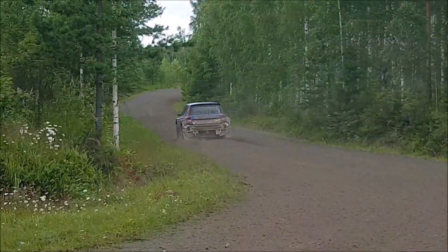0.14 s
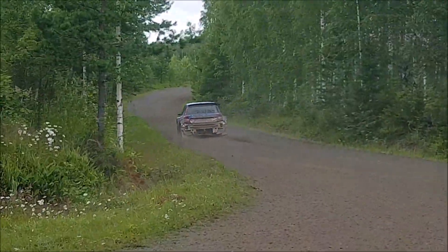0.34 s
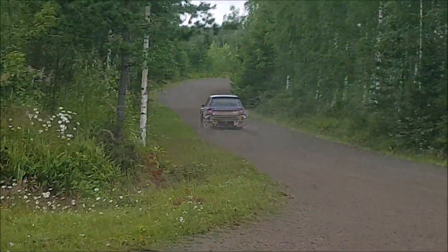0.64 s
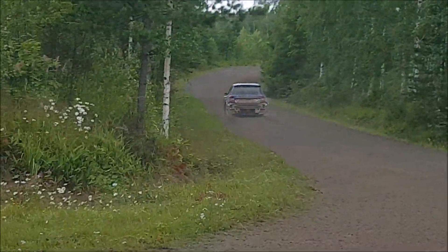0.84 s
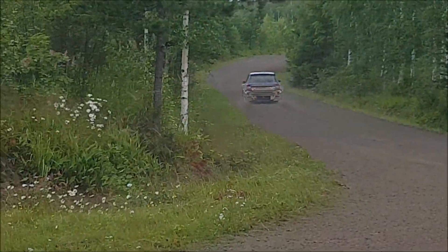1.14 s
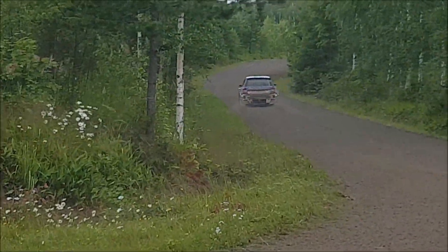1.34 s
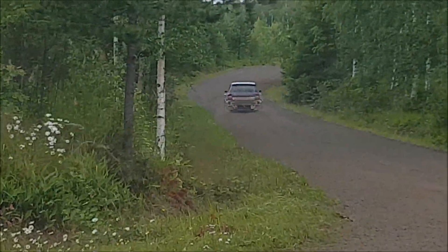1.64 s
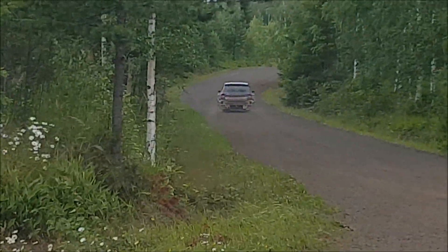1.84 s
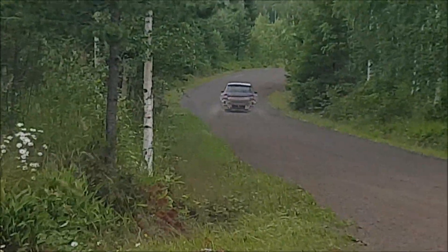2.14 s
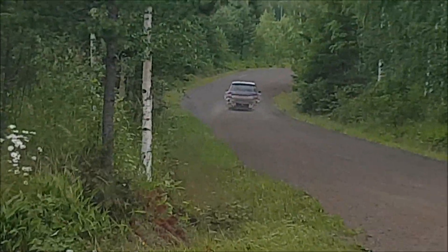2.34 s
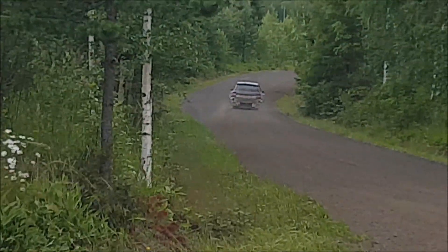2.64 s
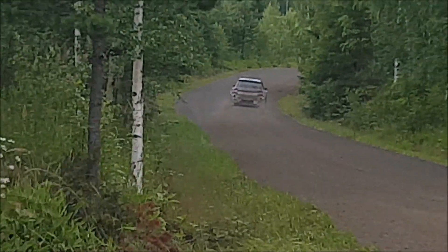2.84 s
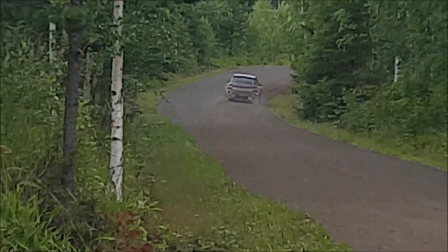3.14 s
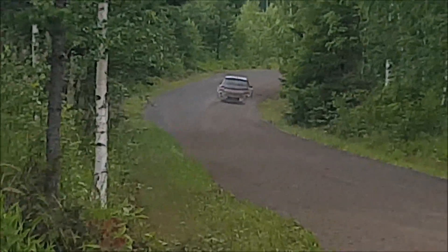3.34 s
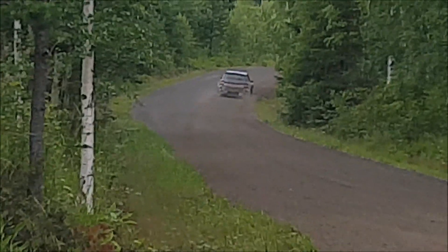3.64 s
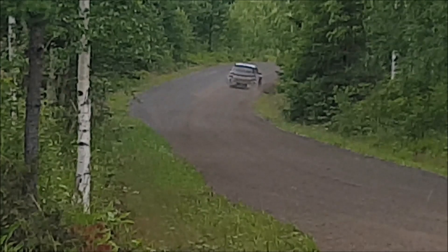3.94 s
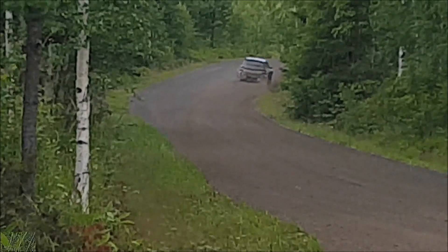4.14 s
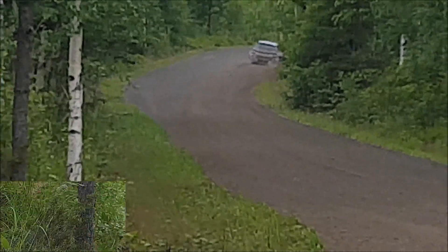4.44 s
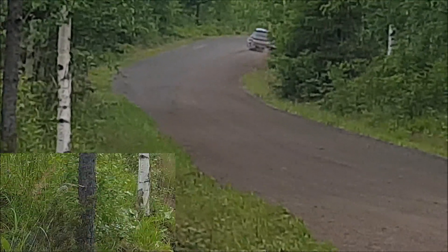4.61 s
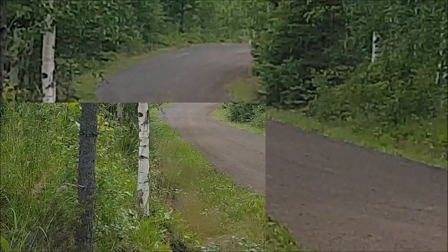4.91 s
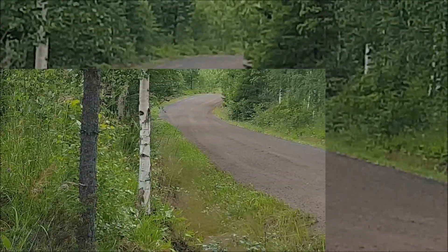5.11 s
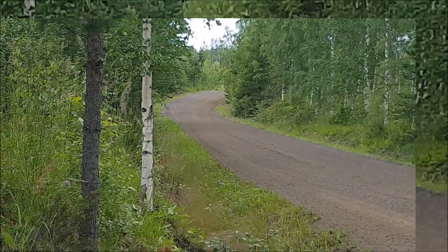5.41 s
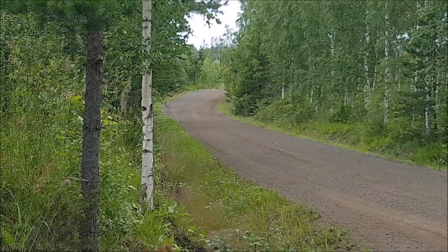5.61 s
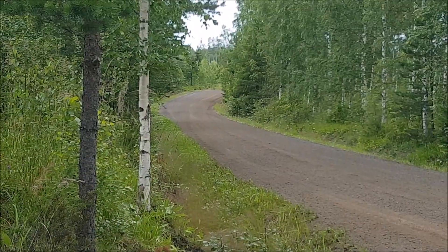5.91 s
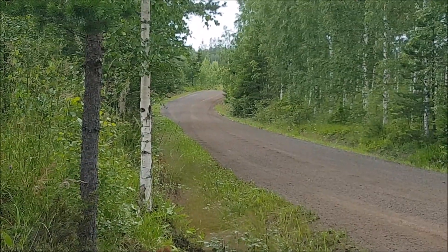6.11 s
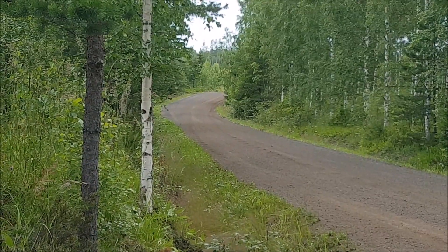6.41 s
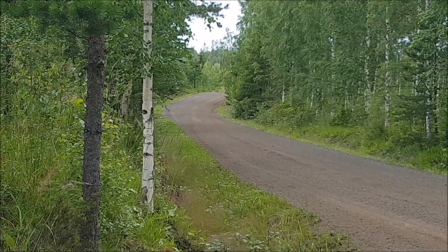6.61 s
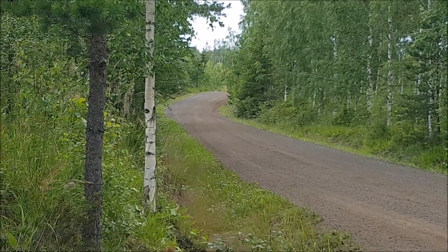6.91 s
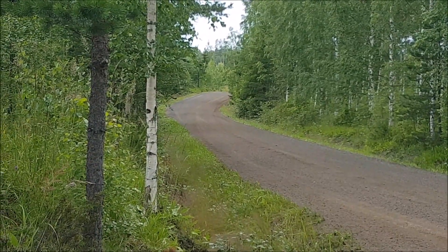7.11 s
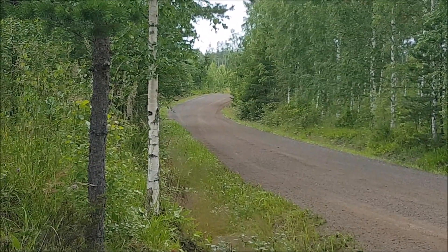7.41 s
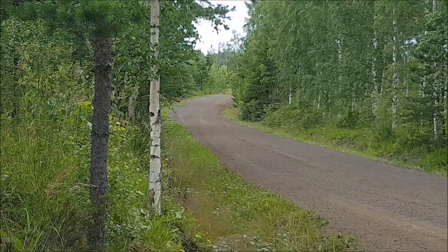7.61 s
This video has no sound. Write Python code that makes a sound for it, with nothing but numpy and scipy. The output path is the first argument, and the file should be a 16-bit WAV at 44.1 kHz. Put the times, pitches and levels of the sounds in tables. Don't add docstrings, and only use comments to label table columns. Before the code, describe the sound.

A loud low engine drone climbs, drops at a gear change with a thudding backfire, climbs again, drops with a cluster of cracks and climbs more faintly. Gravel hisses and stones tick. The sound is strong on the right, dull with wind thumps on the left. After an abrupt click, a far car hums and whines through trees with soft road roar, far quieter and more centred.

```python
import sys
import numpy as np
from scipy import signal
from scipy.fft import rfft, irfft, next_fast_len
from scipy.io import wavfile
from scipy.ndimage import uniform_filter1d

SR = 44100
rng = np.random.default_rng(int(sys.argv[2]) if len(sys.argv) > 2 else 0)


def voltage_ratio(decibels):
    exponent = np.asarray(decibels, float) / 20
    return 10 ** exponent


def transcribe(signal):
    frames = np.atleast_2d(signal).T
    limited = np.clip(frames, -1, 1)
    pcm = np.round(limited * 32767).astype(np.int16)
    wavfile.write(sys.argv[1], SR, pcm)


N = 342201
PAD = next_fast_len(N)
t = np.arange(N) / SR
f = np.arange(PAD // 2 + 1) * SR / PAD + 1e-9
SECOND_IN_S, FIRST_OUT_S = 4.125, 5.53695

# (time [s], firing rate [Hz], boom level [dB], tailpipe rasp level [dB])
LEAVING = [(0, 184.5, -12, -43), (.39, 196.4, -12, -43), (.478, 146, -15, -44), (.65, 151.8, -14.5, -47),
           (.84, 157.8, -14.5, -38.5), (1.1, 163.2, -15.5, -35), (1.34, 167.6, -14, -39.5),
           (1.73, 173.6, -15, -35), (2.05, 178.9, -15, -36), (2.48, 185.5, -15.5, -36),
           (2.58, 145, -19.5, -34.5), (2.92, 150.3, -20, -36.5), (3.3, 155.2, -21.5, -29),
           (3.69, 159.4, -22.5, -33), (4.27, 165.6, -24, -34.5), (4.82, 168.3, -23, -39.5),
           (5.2, 172.6, -23, -42.5), (5.47, 174, -24, -40)]
# (time [s], revs sag [Hz], bark flare [dB])
SHIFTS = [
    (.478, 14, 4),
    (2.576, 11, -1.5),
    (5.5, 4.5, -10),
]
# (time [s], half length [s], boom level [dB])
MISFIRES = [
    (.406, .004, -8),
    (.415, .005, -12),
    (2.507, .006, -9),
    (2.541, .004, -10),
    (2.59, .004, -6),
    (5.507, .006, -12),
    (5.529, .004, -8),
    (5.5365, .002, 4),
]
# (time [s], level [dB])
THROB = [(0, -32), (.38, -21), (.45, -31.5), (2.5, -36.5), (2.7, -36), (5.54, -34)]
# (multiple of firing rate [ratio], level [dB])
BARK_ORDERS = [(1.5, -11.5), (2, -1), (2.5, -19.5), (3, -7), (3.5, -27.5), (4, -13.5), (4.5, -25), (5, -23),
               (5.5, -29), (6, -21)]
# (frequency [Hz], gain [dB])
SILENCER = [(200, 3.5), (330, 0), (480, -3), (530, -7), (570, -18.5), (640, -13.5), (720, -0.5), (800, 0.5),
            (880, -8), (1000, 3.5), (1120, 6.5)]
# (frequency [Hz], gain [dB])
TAILPIPE = [(550, -33), (700, -6.5), (900, -14.5), (1020, -15.5), (1130, -10), (1250, 4), (1400, -2.5),
            (1560, -25), (1850, -2), (2150, -21), (2500, -10.5), (2700, -25.5), (2850, -39.5)]
# (time [s], level [dB])
TYRES = [(0, -42.5), (.42, -43), (.455, -38), (.56, -42), (1.1, -41), (1.75, -43.5), (2.2, -45.5),
         (2.48, -46), (2.55, -45), (2.95, -44), (3.25, -48), (3.55, -44), (3.9, -48.5), (4.3, -49),
         (4.8, -51), (5.2, -54), (5.54, -53.5)]
# (frequency [Hz], density [dB per Hz])
GRAVEL_COLOUR = [(30, -3.5), (100, 9.5), (200, 18), (400, 7.5), (880, -3), (1570, -8), (1860, -5),
                 (2600, -8), (3200, -9.5), (4740, -12.5), (6000, -23), (7300, -33), (8500, -47.5),
                 (12000, -47.5), (16000, -51)]
# (time [s], peak level [dB], ring frequency [Hz])
STONES = [(0.625, -32.5, 4510), (1.094, -29, 4120), (1.2616, -29, 4063), (1.4366, -16.5, 4570),
          (1.455, -38.5, 4160), (1.4936, -22.5, 5230), (1.7165, -19, 5160), (1.848, -17.5, 4340),
          (1.94, -38.5, 4540), (2.0558, -42, 4377), (2.1444, -30.5, 4560), (2.1548, -35.5, 4330),
          (2.429, -37.5, 4620), (2.5515, -45, 3980), (2.7363, -36.5, 3910), (2.7562, -30.5, 3780),
          (3.9844, -26.5, 4720), (4.2533, -24, 3820), (4.2926, -50, 4150)]
# (time [s], level [dB])
PUFFS = [(.072, -28.5), (.327, -26), (.403, -16), (.478, -21), (.517, -20), (.74, -23.5), (.802, -24),
         (.924, -19.5), (1.158, -22), (1.219, -19), (1.279, -26), (1.343, -24), (1.414, -24),
         (1.481, -24.2), (1.585, -25), (1.637, -21), (1.766, -25), (1.817, -21), (2.088, -22),
         (2.214, -25.7), (2.291, -24), (2.388, -27), (2.694, -26), (2.785, -25), (2.831, -25), (2.954, -24),
         (3.063, -24), (3.196, -28), (3.257, -21.5), (4.477, -22.5)]
# (time [s], level [dB])
FLICKS = [
    (3.409, -21),
    (3.474, -31),
    (3.593, -24.5),
    (3.995, -34),
    (4.033, -22),
    (4.252, -26),
    (4.412, -24),
]
# (time [s], peak level [dB], ring frequency [Hz], thud level [dB])
BANGS = [
    (0.437, -28.5, 1317, -25.5),
    (0.4593, -32, 1390, -5.5),
    (0.4729, -32, 1270, -28.5),
    (2.4945, -27, 1250, -10),
    (2.5232, -24, 1283, -13.5),
    (2.5477, -27, 1257, -15),
    (2.5672, -27.5, 1364, -11),
    (2.584, -30, 1268, -7.5),
    (2.7397, -33.5, 1380, -17),
    (5.4922, -25, 1266, -14.5),
]
# (frequency [Hz], gain [dB])
COVER = [(60, -8.5), (170, -19), (320, -24), (500, -30), (780, -32.5), (1300, -31.5), (2200, -43),
         (3600, -56), (7000, -44.5)]
# (time [s], firing rate [Hz], engine level [dB], gear whine level [dB])
FAR_CAR = [(4.2, 193, -51, -46), (4.5, 193.5, -52.5, -45), (4.95, 193, -64.5, -47.5),
           (5.4, 195, -59, -46.5), (5.7, 194, -41.5, -49), (5.95, 195.4, -49.5, -46),
           (6.15, 194, -43, -45.5), (6.3, 204.4, -50, -53), (6.6, 198.6, -58, -61), (6.78, 198.9, -51, -45),
           (7.05, 198, -46, -42), (7.2, 201.8, -46, -45.5), (7.35, 201.7, -54, -50.5),
           (7.5, 200, -44, -47.5), (7.65, 196.7, -48.5, -64), (7.76, 192, -44, -51)]
# (time [s], frequency [Hz])
WHINE_PITCH = [(4.2, 517.2), (5.55, 533), (5.8, 561), (5.97, 566), (6.01, 543.7), (7.05, 546.3),
               (7.33, 526), (7.42, 529)]
# (time [s], roar level [dB], hiss level [dB])
FAR_ROAD = [(4.2, -46, -65.5), (5.1, -45, -65), (5.6, -48, -61), (6.1, -46.5, -60.5), (7.2, -47.5, -60.5),
            (7.76, -51.5, -59)]
# (frequency [Hz], density [dB per Hz])
FAR_ROAR_COLOUR = [(25, -22.5), (50, -15.5), (110, -5), (195, -1), (334, -11.5), (400, -5.5), (548, -2.5),
                   (718, -9), (1050, -8.5), (1400, -16.5), (2070, -24), (3300, -30.5), (4000, -39.5),
                   (6500, -54), (9000, -60)]
# (start [s], end [s], start frequency [Hz], end frequency [Hz], level [dB])
WHISTLES = [
    (6.95, 7.18, 6000, 5960, -83),
    (7.35, 7.6, 5700, 5580, -83),
    (7.62, 7.85, 2190, 2175, -52.5),
    (7.5, 7.85, 4500, 4320, -73),
]


def curves(table):
    s, *columns = np.transpose(table)
    return [np.interp(t, s, c) for c in columns]


def bump(s, width):
    return np.exp(-((t - s) / width) ** 2)


def walk(rate):
    k = int(SR / rate)
    steps = np.repeat(rng.standard_normal(N // k + 1), k)
    return 1.26 * uniform_filter1d(uniform_filter1d(steps, k), k)[:N]


def unit(x):
    return x / np.sqrt(np.mean(x ** 2))


def tint(table, hz):
    corner_hz, db = np.transpose(table)
    return voltage_ratio(np.interp(np.log(hz), np.log(corner_hz), db))


def filt(x, gain):
    return irfft(rfft(x, PAD) * gain, PAD)[:N]


def noise(gain):
    return unit(filt(rng.standard_normal(N), gain))


def patchy(table, flicker_db, rate, split_hz=1500):
    white = rfft(rng.standard_normal(PAD)) * tint(table, f)
    parts = [0, 0]
    for hz in 31.25 * 2. ** np.arange(10):
        bell = np.cos(np.pi / 2 * np.clip(np.log2(f / hz), -1, 1)) ** 2
        band = irfft(white * bell, PAD)[:N] * voltage_ratio(flicker_db * walk(rate))
        parts[int(hz > split_hz)] = parts[int(hz > split_hz)] + band
    return parts


def add(x, s, hz, db, t60, rise=0.00046):
    i = int(s * SR)
    u = np.arange(min(int(t60 * SR), N - i)) / SR
    envelope = np.exp(-np.log(1000) * u / t60) * (1 - np.exp(-u / rise))
    x[i:i + len(u)] -= voltage_ratio(db) * np.sin(2 * np.pi * hz * u) * envelope


def driving():
    hz, boom_db, rasp_db = curves(LEAVING)
    bark_db = -25.5 - 0.1033 * (hz - 150) - 4 * np.maximum(t - 4.1, 0) + .7 * walk(30)
    for s, sag_hz, flare_db in SHIFTS:
        hz = hz - sag_hz * bump(s, 0.01795)
        bark_db = bark_db + flare_db * bump(s, 0.0074)
    return hz, boom_db, bark_db, rasp_db + 1.2 * walk(25), curves(TYRES)[0] + 0.68 * walk(12)


def exhaust_bark(hz, phase):
    bark = 0
    for k, db in BARK_ORDERS:
        wander_db = (.5 + 0.33 * k) * walk(24.036)
        drift_db = 2.5 * (t - 3.5) * (k > 5.2) - 0.91 * t * (k < 2)
        slip = .16 * k * walk(28)
        bark = bark - voltage_ratio(db + wander_db + drift_db) * tint(SILENCER, k * hz) * np.cos(k * phase + slip)
    return bark


def tailpipe_rasp(hz, phase):
    rasp, power = 0, 0
    for n in range(13, 20):
        uneven = voltage_ratio(-13 * (n % 2))
        gain = tint(TAILPIPE, hz * n / 2) * uneven / (1 + (hz * n / 3040) ** 30)
        rasp = rasp + gain * voltage_ratio(1.1 * walk(22)) * np.cos(n * phase / 2 + 0.73 * walk(30))
        power = power + gain ** 2 / 2
    return rasp / np.sqrt(power)


def engine(hz, boom_db, bark_db, rasp_db, gravel_db):
    stumble = sum(bump(s, .03) for s, half, db in MISFIRES)
    unsteady = 1 + .0018 * walk(30) + .05 * stumble * walk(90)
    phase = 2 * np.pi * np.cumsum(hz * unsteady) / SR
    phase = phase - phase[int(FIRST_OUT_S * SR)]
    firing = voltage_ratio(sum(db * bump(s, half) for s, half, db in MISFIRES))
    boom = -np.cos(phase) * voltage_ratio(.4 * walk(30))
    boom = boom + voltage_ratio(curves(THROB)[0] + 2.0 * walk(20)) * np.cos(phase / 2)

    bark = exhaust_bark(hz, phase)
    rasp = tailpipe_rasp(hz, phase) / (1 + 1.3 * stumble)
    gas = noise(tint(TAILPIPE, f) * (f > 500) * (f < 1560))
    gas = gas * (1 + .95 * np.cos(phase)) * voltage_ratio(-6 + walk(25))
    fizz = noise(tint(TAILPIPE, f) * (f > 1560) * (f < 3200)) * (1 + 0.44 * np.cos(phase))
    fizz_db = gravel_db - 7.5 + 2.0 * t + 2.0 * walk(30)
    upper = np.sqrt(2) * voltage_ratio(bark_db) * bark + voltage_ratio(rasp_db - 2.0) * (rasp + gas) + voltage_ratio(fizz_db) * fizz
    return np.sqrt(2) * voltage_ratio(boom_db) * firing * boom, upper


def gravel(db):
    low, high = patchy(GRAVEL_COLOUR, flicker_db=1.2, rate=22)
    blend = voltage_ratio(-2.5) * low + voltage_ratio(-0.05 + 0.18 * walk(40)) * high
    spray = voltage_ratio(db) / np.sqrt(np.mean(high ** 2)) * blend
    top = filt(spray, 1 / (1 + (4800 / f) ** 8))
    spray = spray + top * (voltage_ratio(5.0 - 2.0 * t) - 1)
    for s, peak_db, hz in STONES:
        add(spray, s, hz, peak_db + 1, t60=.003, rise=.0004)
    for when, size, pitch in rng.random((90, 3)):
        s = 5.5 * when
        add(spray, s, 3500 + 2300 * pitch, db[int(s * SR)] - 1 + 7 * size, t60=.0035, rise=.0002)
    return spray


def trees(x, t60, wet_db):
    u = np.arange(SR) / SR
    tail = rng.standard_normal(SR) * np.exp(-np.log(1000) * u / t60) * (1 - np.exp(-u / 0.0097))
    return x + voltage_ratio(wet_db) * signal.fftconvolve(x, tail / np.sqrt(np.sum(tail ** 2)))[:N]


def port_rumble(boom_db):
    sides = []
    for db in (-44, -36):
        level_db = db + 2.7 * walk(6.3) + 0.76 * boom_db
        sides.append(noise(1 / (1 + (f / 60) ** 2)) * voltage_ratio(level_db))
    return sides


def port_hiss():
    sides = []
    for _ in range(2):
        level_db = -75 + 7.0 * np.exp(-t / .9) + 1.5 * walk(40)
        sides.append(noise(.12 + 1 / (1 + (11000 / f) ** 6)) * voltage_ratio(level_db))
    return sides


def wind_puffs():
    x = np.zeros(N)
    half = 1500
    u = np.arange(-half, half) / SR
    puff_hz, flick_hz = 55, 150
    small = [(.05 + 4.4 * s, -33.5 + 10 * (size - .5)) for s, size in rng.random((24, 2))]
    for rows, hz in ((PUFFS + small, puff_hz), (FLICKS, flick_hz)):
        swing = -np.cos(2 * np.pi * 1.3 * hz * u + 0.81 * puff_hz / hz) * np.exp(-(u * hz / 0.29) ** 2)
        for s, db in rows:
            i = int(s * SR) - half
            x[i:i + len(u)] += voltage_ratio(db + 1.5) * hz / puff_hz * swing
    return x


def exhaust_bangs():
    x, crack = np.zeros(N), np.zeros(N)
    for s, db, hz, thud_db in BANGS:
        add(x, s, hz, db + 7, t60=.038)
        add(x, s, 1.9 * hz, db - 5.0, t60=.025)
        add(x, s - .002, 255, thud_db, t60=0.077, rise=0.0026)
        crack = crack + voltage_ratio(db - 18.0) * np.exp(-np.abs(t - s) / 0.015) * (t > s)
    bass_cut = (f / 1500) ** 2 / (1 + (f / 1500) ** 2)
    return x + crack * noise(bass_cut / (1 + (f / 3800) ** 8))


def leaving_car():
    hz, boom_db, bark_db, rasp_db, gravel_db = driving()
    boom, upper = engine(hz, boom_db, bark_db, rasp_db, gravel_db)
    boom = trees(boom, t60=.5, wet_db=-24)
    upper = trees(upper + exhaust_bangs(), t60=.7, wet_db=-12)
    right = voltage_ratio(5.5) * (boom + upper + gravel(gravel_db))
    left = filt(right, tint(COVER, f) * np.exp(-1.2j))
    ports = np.array([left + wind_puffs(), right]) + port_rumble(boom_db) + port_hiss()
    return ports * (t < FIRST_OUT_S)


def tone(hz, db, wobble_db=2.0, rate=12, drift=.006):
    phase = 2 * np.pi * np.cumsum(hz * (1 + drift * walk(2 * rate))) / SR
    return np.sqrt(2) * voltage_ratio(db + wobble_db * walk(rate)) * np.cos(phase)


def far_engine_and_gears():
    hz, engine_db, whine_db = curves(FAR_CAR)
    whine_hz = curves(WHINE_PITCH)[0]
    half_db = -60 + 9.5 * bump(7.45, 0.28) + 3.0 * walk(5.3)
    firing = tone(hz, engine_db) + tone(2 * hz, engine_db / 2 - 35.5, wobble_db=4.0)
    return firing + tone(whine_hz, whine_db) + tone(whine_hz / 2, half_db)


def far_road():
    roar_db, hiss_db = curves(FAR_ROAD)
    draws = []
    for _ in range(2):
        low, high = patchy(FAR_ROAR_COLOUR, flicker_db=1.1, rate=18)
        draws.append(voltage_ratio(roar_db + 3.5) * unit(low) + voltage_ratio(hiss_db + 3.5) * unit(high))
    return draws


def twig():
    x = np.zeros(N)
    add(x, 4.468, 5000, -46, t60=.004, rise=.0001)
    return x


def far_whistles():
    x = np.zeros(N)
    for s0, s1, hz0, hz1, db in WHISTLES:
        glide_hz = np.interp(t, [s0, s1], [hz0, hz1])
        fade = np.interp(t, [s0, s0 + .05, s1 - .05, s1], [0, 1, 1, 0])
        x = x + tone(glide_hz, db, wobble_db=4.0, rate=150, drift=.024) * fade
    return x


def nearing():
    drone_db = np.interp(t, [7.0, 7.7], [-64, -50])
    drone = voltage_ratio(drone_db) * noise((f / 110) ** 2 / (1 + (f / 110) ** 5))
    spit_db = np.interp(t, [7.0, 7.76], [-82, -67]) + 2 * walk(30)
    spit = voltage_ratio(spit_db) * noise((f > 3500) / (1 + (f / 7000) ** 8))
    intake_db = np.interp(t, [7.1, 7.6, 7.76], [-74, -63, -66]) + 2.5 * walk(40)
    intake = voltage_ratio(intake_db) * noise(np.exp(-((f - 2750) / 160) ** 2))
    return drone + spit + intake


def far_car():
    road_mid, road_side = far_road()
    mid = road_mid + far_engine_and_gears() + twig() + far_whistles() + nearing()
    side = filt(road_side, .9 / (1 + (600 / f) ** 2))
    hiss = [noise(1 / (1 + (10000 / f) ** 6)) * voltage_ratio(-74.0) for _ in range(2)]
    stereo = np.array([voltage_ratio(-1.3) * (mid + side), voltage_ratio(-0.05) * (mid - side)]) + hiss
    return stereo * np.clip((t - SECOND_IN_S) / 0.016, 0, 1)


def scene():
    return leaving_car() + far_car()


def band_limit(x):
    return signal.sosfilt(signal.butter(12, 15830, fs=SR, output="sos"), x)


def record(dry):
    wet = signal.sosfilt(signal.butter(2, 28, "high", fs=SR, output="sos"), dry)
    size = np.abs(wet)
    rounded = np.sign(wet) * (.7 + .24 * np.tanh((size - .7) / .24))
    wet = np.where(size > .7, rounded, wet)
    return band_limit(wet)


dry = scene()
out = record(dry)
transcribe(out)
```